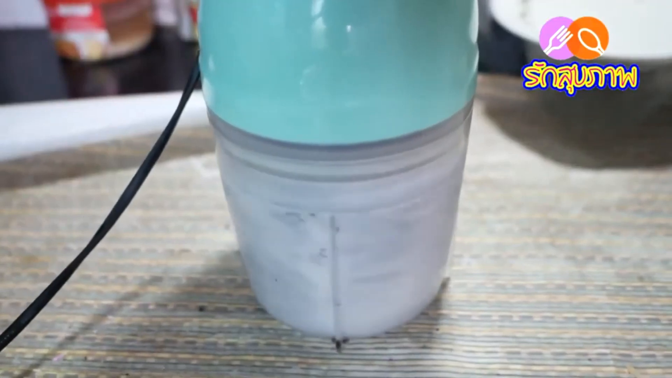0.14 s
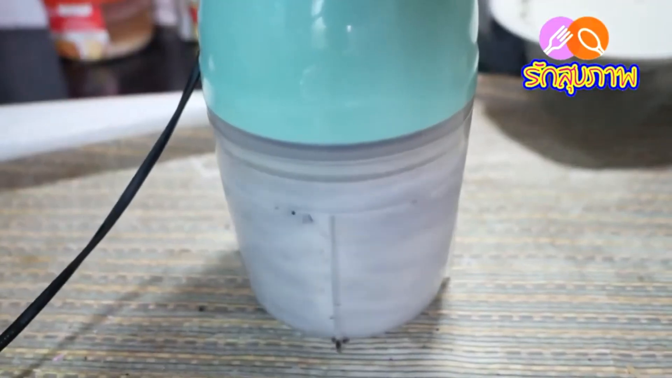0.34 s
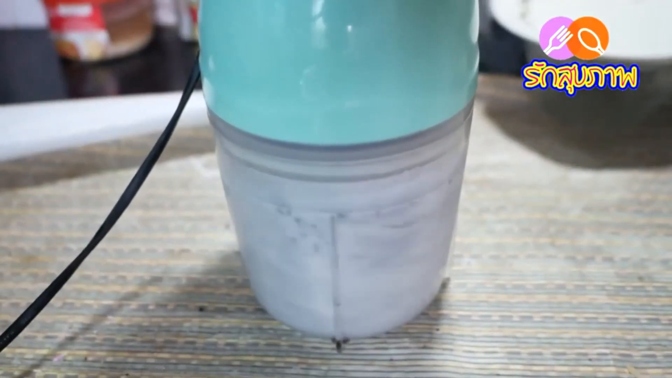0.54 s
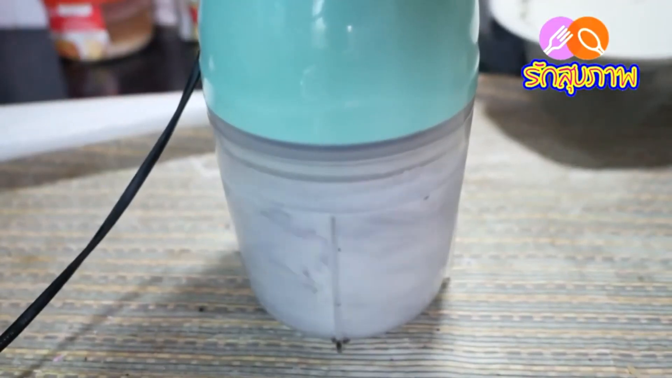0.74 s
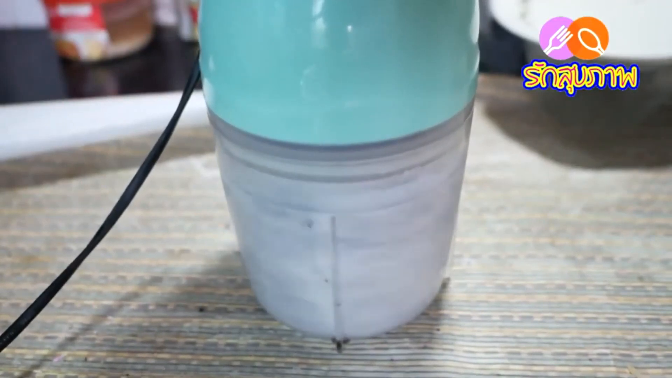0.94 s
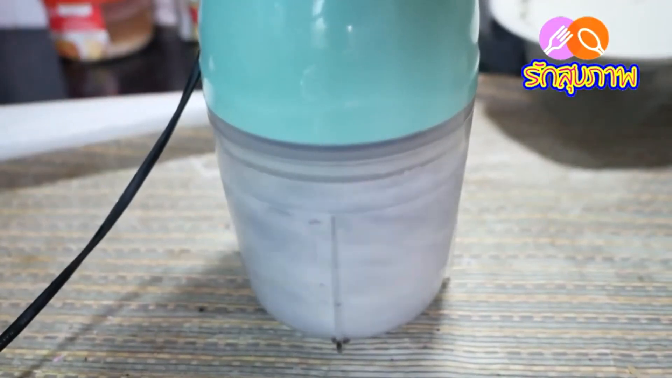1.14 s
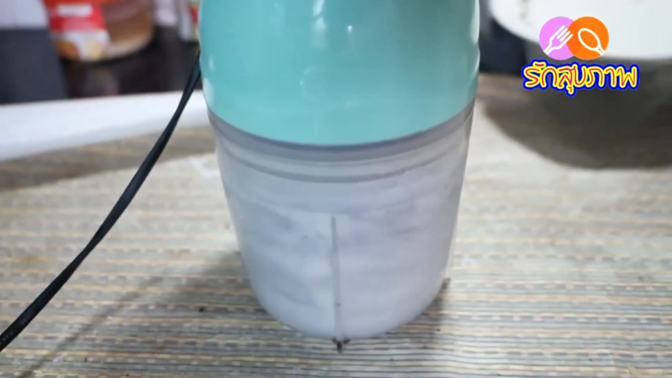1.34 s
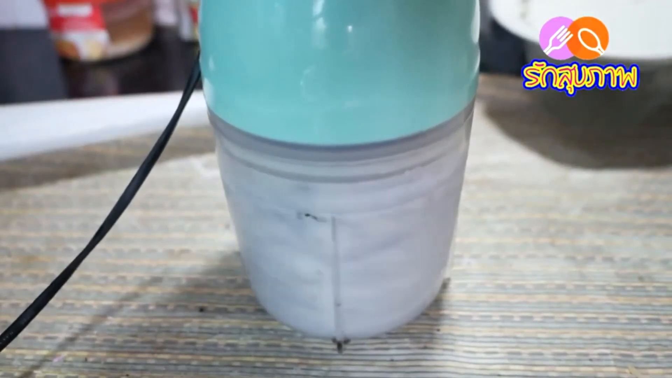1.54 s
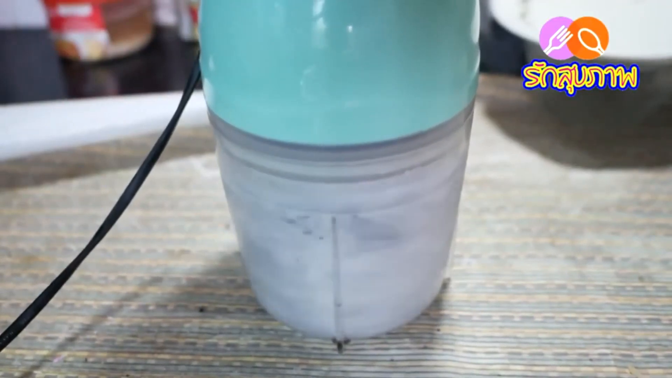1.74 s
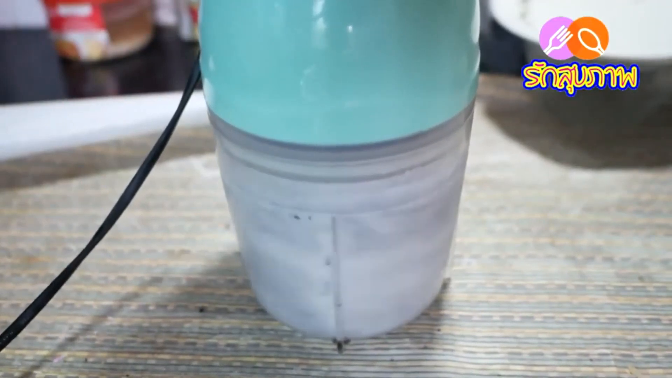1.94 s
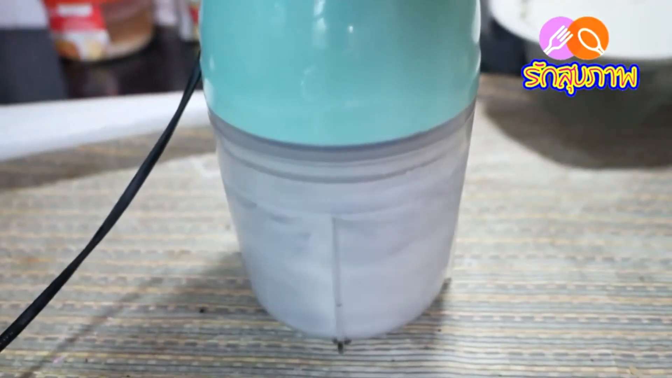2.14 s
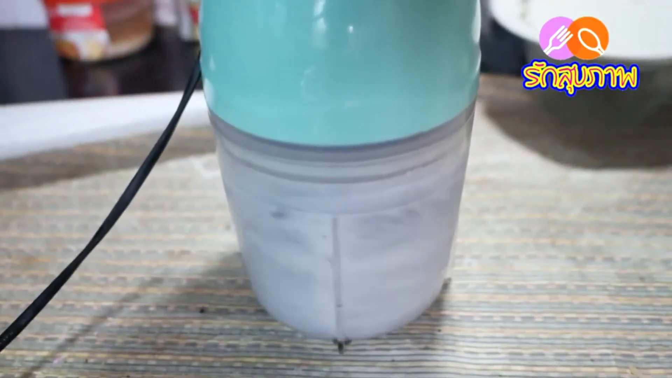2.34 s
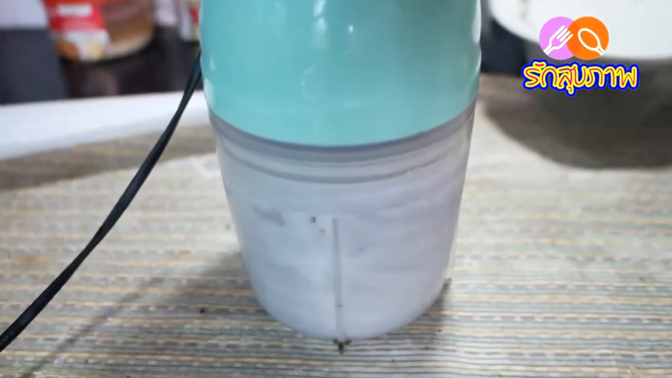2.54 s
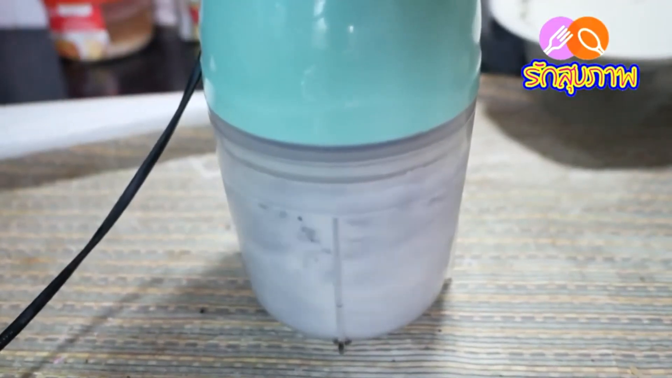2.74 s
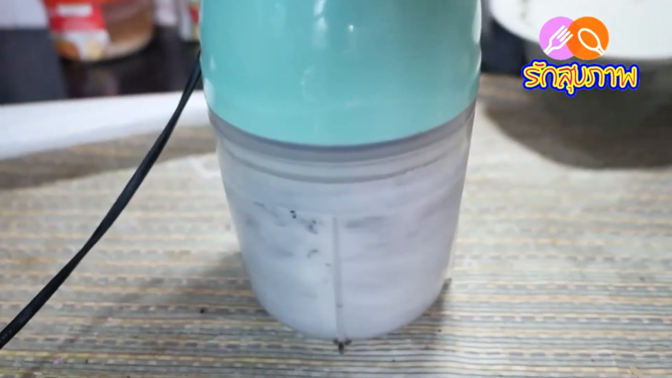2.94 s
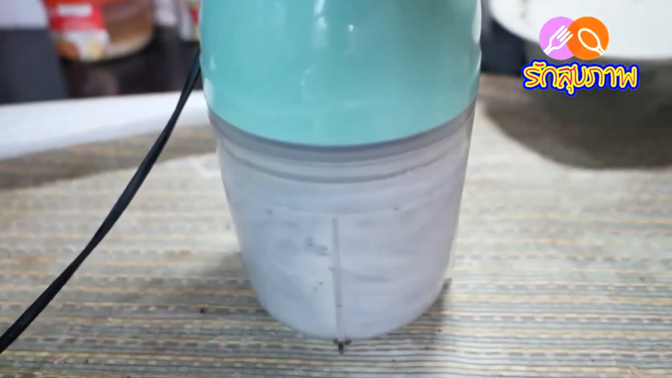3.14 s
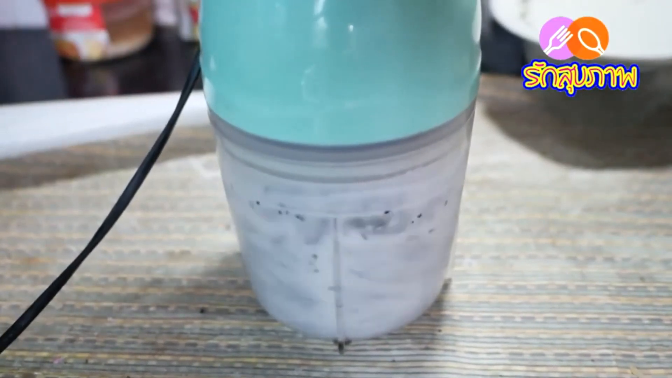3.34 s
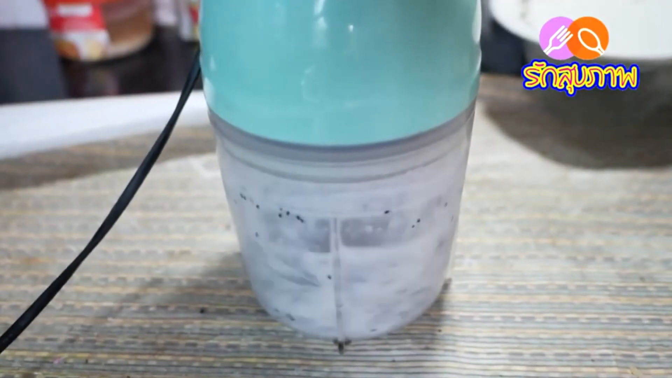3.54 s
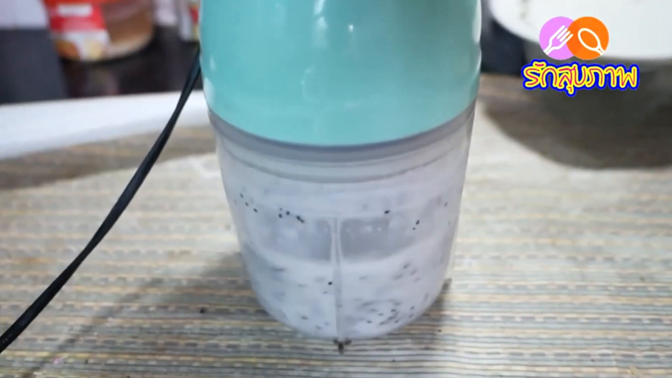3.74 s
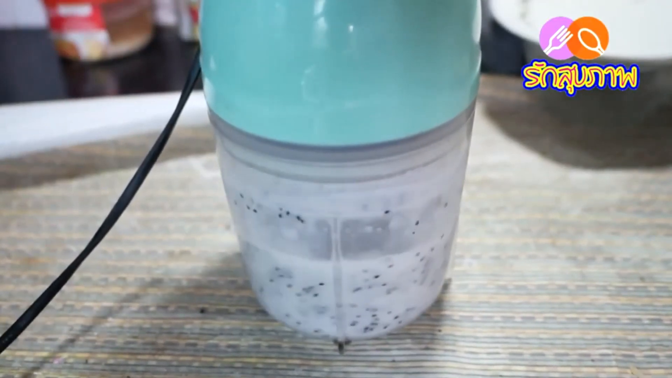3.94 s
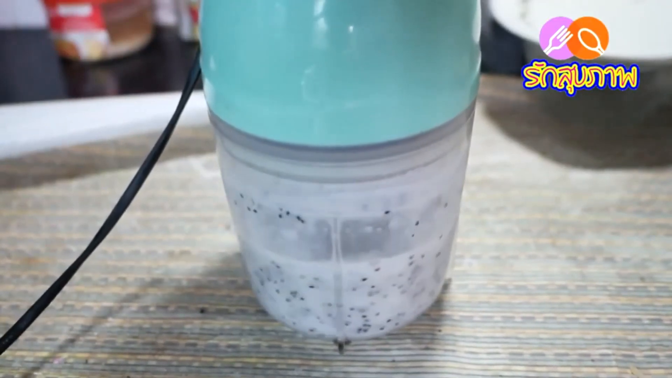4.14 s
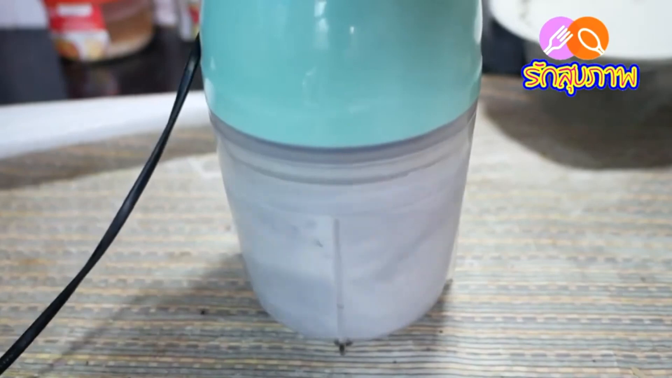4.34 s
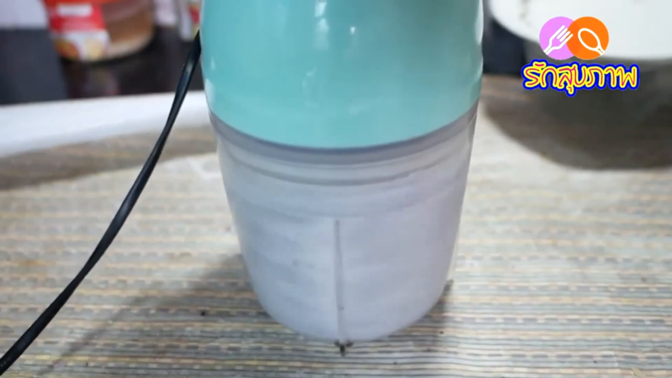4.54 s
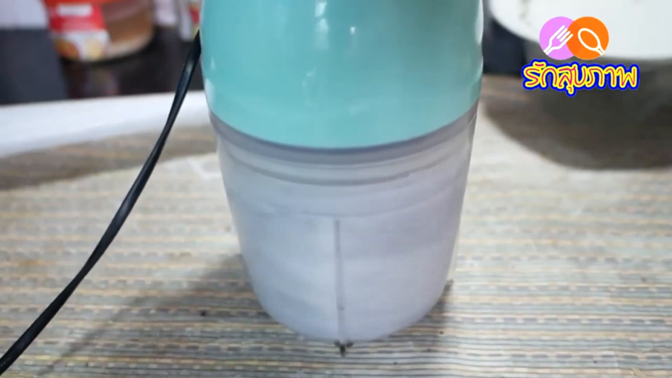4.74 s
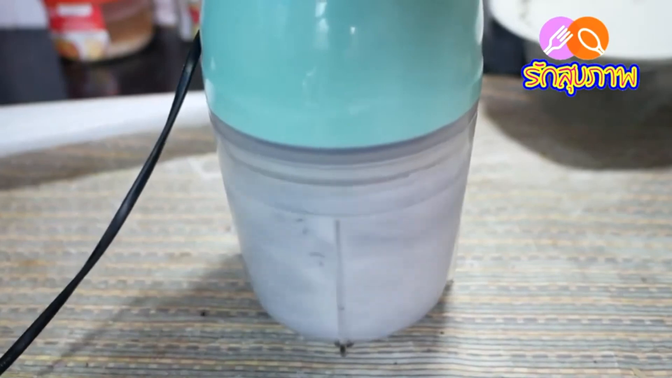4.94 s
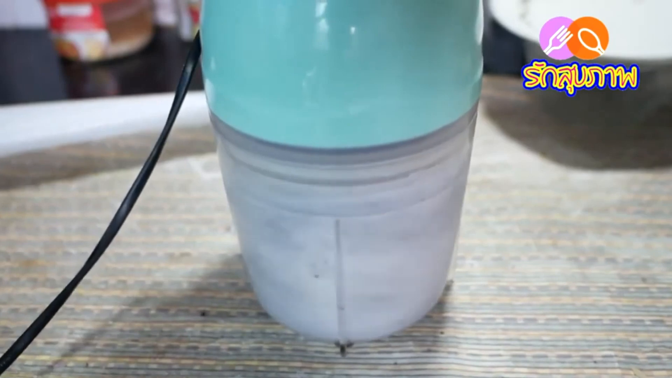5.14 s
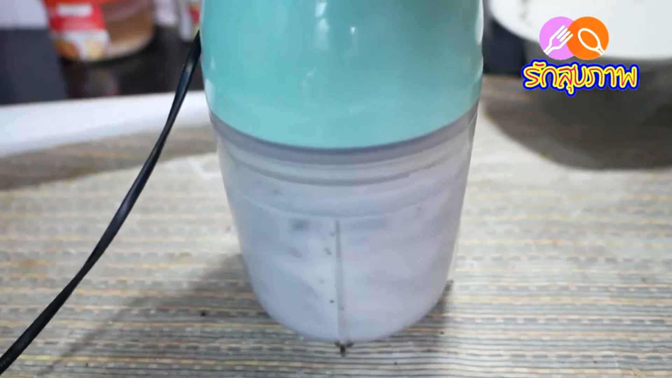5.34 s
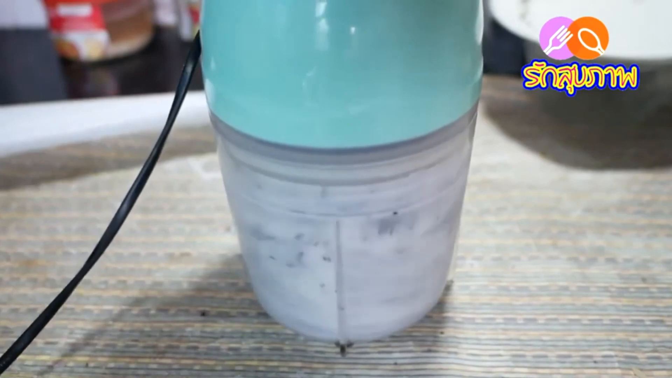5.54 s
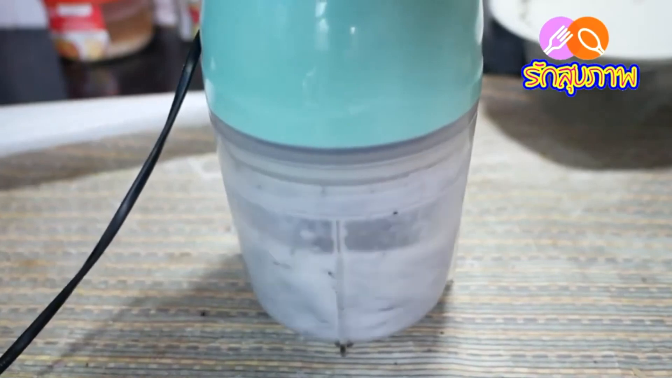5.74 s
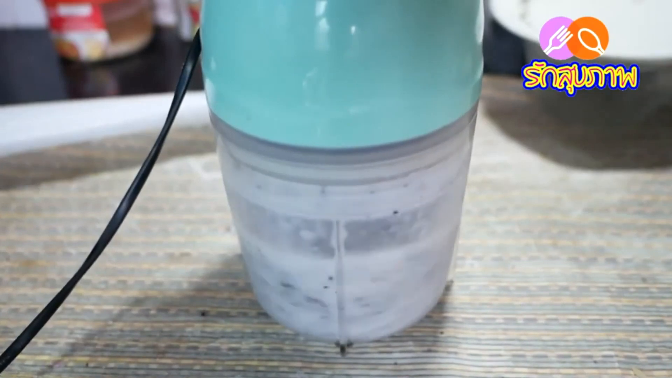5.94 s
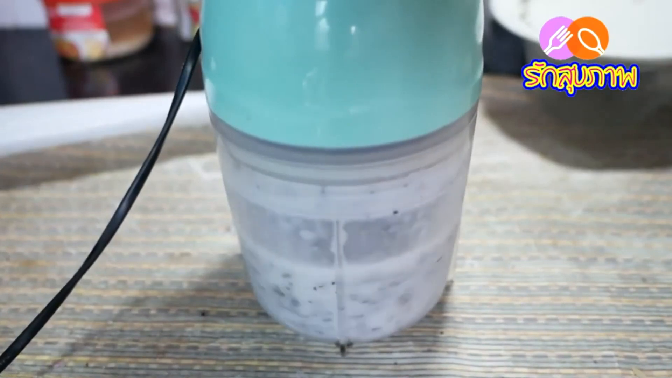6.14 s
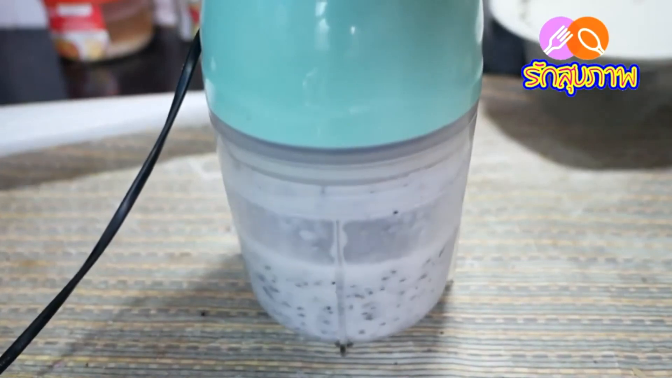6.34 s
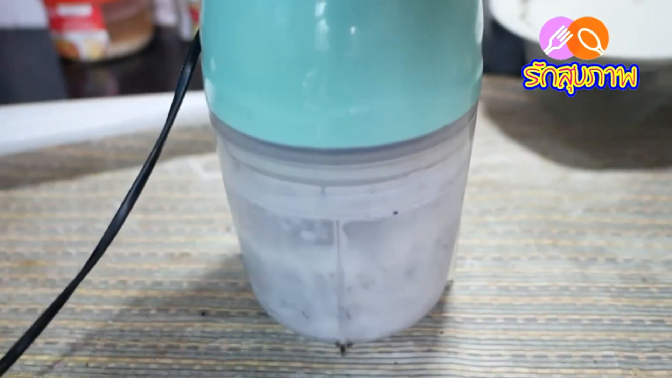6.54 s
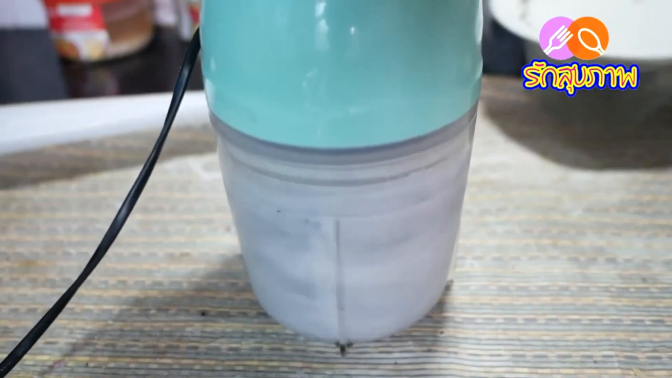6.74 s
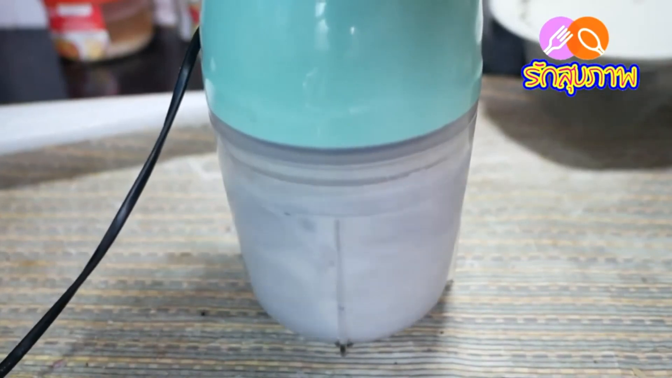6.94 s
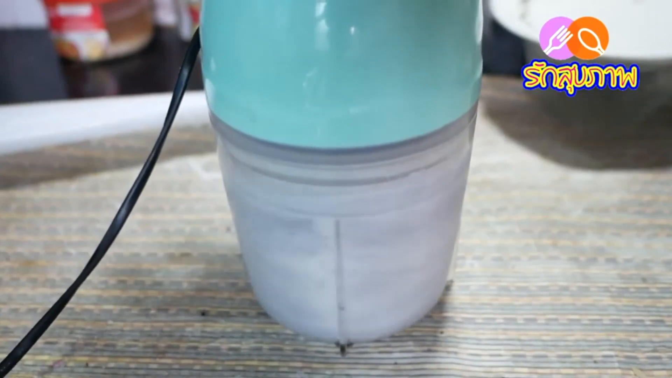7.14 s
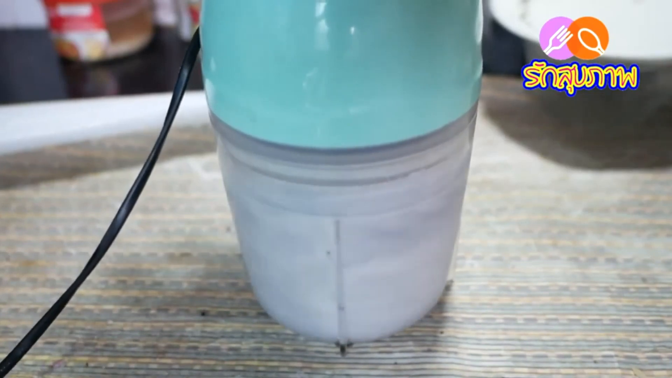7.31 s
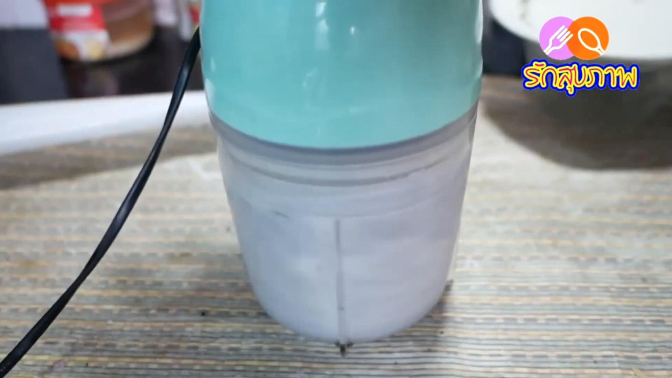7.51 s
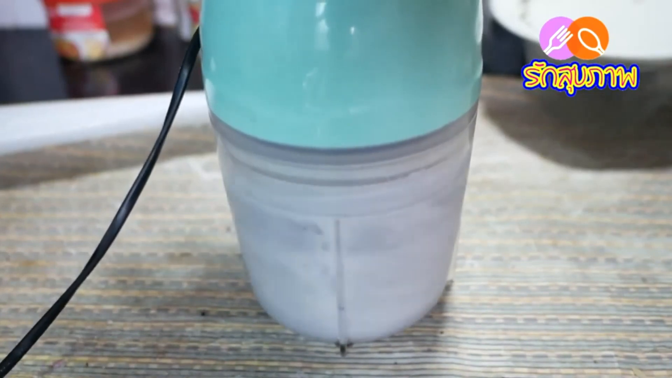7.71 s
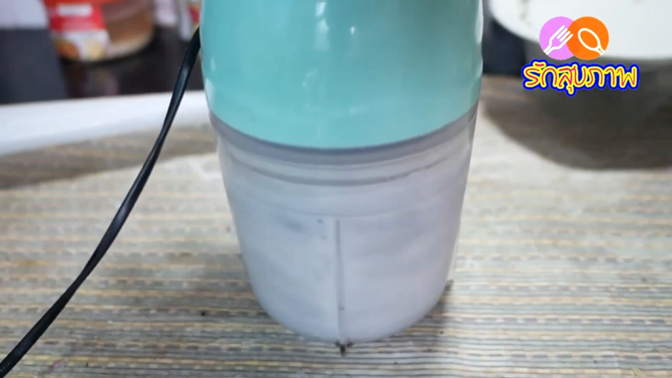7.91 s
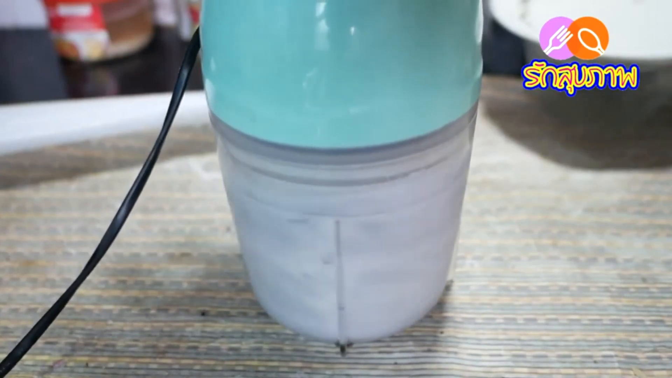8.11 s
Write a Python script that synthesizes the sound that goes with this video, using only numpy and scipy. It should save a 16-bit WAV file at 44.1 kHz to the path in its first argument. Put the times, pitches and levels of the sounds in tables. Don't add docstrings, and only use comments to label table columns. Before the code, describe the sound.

Hard ice lumps knock rapidly around a plastic blender cup over hissing slush; two coasting stops leave sparse clicks before the crunching roar restarts.

```python
import sys
import numpy as np
from scipy import signal
from scipy.fft import rfft, irfft, next_fast_len
from scipy.io import wavfile
from scipy.ndimage import uniform_filter1d

SR = 44100
rng = np.random.default_rng(int(sys.argv[2]) if len(sys.argv) > 2 else 0)


def unload_audio(sound):
    columns = np.transpose(np.atleast_2d(sound))
    steps = np.round(np.clip(columns, -1, 1) * 32767)
    wavfile.write(sys.argv[1], SR, steps.astype(np.int16))


def invert_db(level):
    return 10 ** (np.asarray(level, dtype=float) / 20)


N = 364866

# f/Hz, level/dB per Hz
KITCHEN = [(15, -40), (25, -10), (80, -9), (146, -11), (604, -13.5), (1500, -24.5), (5140, -28.5),
           (15000, -53)]
KITCHEN_DB = -63
HUM_HZ, HUM_DB = 50, -73
# f/Hz, T60/s
ROOM_T60 = [(200, 0.18), (1500, 0.097), (5000, 0.21), (14000, 0.015)]
# f/Hz, width/Hz, level/dB
TABLE_MODES = [(102, 22, -4), (192, 34, -1), (228, 30, -3), (125, 40, -2), (265, 50, -4)]
# t/s, level/dB
LURCHES = [
    (4.318, -25),
    (6.665, -22),
]

# on t/s, off t/s, blade stall t/s, lump heft level/dB, grit level/dB
BURSTS = [
    (-.06, 2.85, 3.32, -1.5, -1),
    (4.303, 5.13, 5.595, -6, -1.5),
    (6.654, 9, 9.5, -6.5, 0),
]
RATTLE, CRACKLE, THUD, SHAKE = range(4)
RUN_DB = [-21, -29.5, -22, -41]
BITE_DB = [14, 9, -9, 8]
BITE_S = [0.019, 0.21, 0.18, 0.19]
WEAR_DB_PER_S = [-1.07, -2.1, -3.5, -0.38]
COAST_DB_PER_S = [-12, -8.5, -27.5, -15]
REST_DB = [-20.5, -28, -31, -17.5]
REST_S = [0.41, 0.055, 0.22, 0.18]
STIR_DB = [-12.5, -25, -22, -40]
STIR_S = 0.033
GRAB_S, GRAB_DB = 0.036, -29
STALL_DB, STALL_S = -7, 0.02

GROAN_DB, GROAN_HZ, GROAN_WIDTH_HZ = -39.5, 419, 120
GROAN_FALL_S, GROAN_FADE_S = 0.7, 0.082

# top speed f/Hz, starting lag f/Hz, time constant t/s
SPIN = [(219, 76, .9), (213, 110, .27), (213, 100, .26)]
JAM_AT_S, JAM_HZ, JAM_S = 2.27, 5.5, 0.25
# 14th order level/dB, 15th order level/dB
SING_DB = [(-31, -36), (-34, -35), (-31, -35)]
SING_FROM_S = [.55, 4.66, 7.07]
# f/Hz, level/dB
HOUSING = [(2715, -24), (2775, -1), (2900, 1), (2965, -6), (3010, -8), (3160, -11), (3300, -20)]

# f/Hz, level/dB per Hz
CHIPS = [(1180, -65), (2000, -8), (2890, -11), (3150, -15.5), (3880, -8.5), (8260, -15), (14700, -31),
         (15600, -40.5)]
# f/Hz, width/Hz, level/dB
BLADE = [(3370, 90, -8), (3920, 80, -8), (4980, 60, -14), (6430, 120, -18.5)]
# f/Hz, level/dB per Hz
SLUSH = [(180, -24.5), (429, -6.5), (988, -9.5), (1410, -7.5), (1760, -18), (4000, -18), (5200, -12.5),
         (8800, -120)]
# f/Hz, width/Hz, level/dB
CUP = [(1500, 230, -6.5), (1294, 60, 1.5), (1539, 89, -2), (1765, 62, 1), (1984, 26, -7.5),
       (2342, 350, 2.5), (2500, 160, -15), (2650, 200, -6), (3514, 22, -12.5), (5180, 210, -13)]
# f/Hz, width/Hz, level/dB
FOOT = [(395, 29, 0.5), (448.4, 46, 9.5), (550, 53, 3.5), (729, 75, -0.5)]

# t/s, peak level/dB, ring f/Hz
SETTLING_TICKS = [(3.29, -18, 1260), (3.332, -24.5, 942), (3.375, -22, 905), (3.394, -23, 1300), (3.428, -31, 900),
                  (3.49, -37, 851), (3.506, -30, 937), (3.546, -26.5, 940), (3.623, -25, 905), (3.704, -33, 961),
                  (3.743, -32.5, 1500), (3.78, -31, 1830), (3.82, -38.5, 1900), (3.878, -43, 1900),
                  (3.941, -36.5, 2710), (3.972, -46, 2600), (3.988, -38, 960), (4.093, -36, 990),
                  (5.59, -15.5, 1110), (5.633, -42.5, 950), (5.654, -24.5, 1080), (5.678, -47, 1110),
           (5.709, -33, 2280), (5.739, -28, 1210), (5.793, -24, 1040), (5.827, -39.5, 1300),
           (5.86, -26, 1300), (5.888, -30.5, 1920), (5.922, -36, 1130), (5.962, -29.5, 1910),
           (6.038, -35, 1830), (6.091, -34, 1140), (6.194, -27.5, 1040), (6.25, -39.5, 1210),
           (6.379, -35.5, 1810), (6.432, -41.5, 1900), (6.548, -43, 960), (6.565, -41, 1810)]
TICKS = SETTLING_TICKS
# t/s, peak level/dB, pitch f/Hz
LONE_SNAPS = [(0.0205, -15.5, 3670), (0.0503, -4.5, 3870), (0.1386, -10, 5480), (0.329, -15.5, 3730),
              (0.5152, -19, 3080), (0.5376, -12, 4950), (0.7143, -17, 3750), (0.8376, -18.5, 4860),
              (0.8598, -22.5, 4800), (0.914, -14.5, 3630), (0.99, -16, 3920), (3.0346, -18, 4670),
              (3.0939, -17.5, 3900), (3.1446, -12.5, 3930), (3.2162, -21.5, 3880), (3.234, -11.5, 3970),
              (3.277, -18, 5020), (3.2894, -15, 6500), (3.3736, -16.5, 3850), (3.518, -31.5, 6000),
              (3.532, -32, 8000), (3.584, -28.5, 7900), (3.64, -38.5, 6000), (3.674, -49, 7000),
              (3.7392, -31.5, 3370), (3.762, -49, 8500),
              (4.33, -6.5, 3060), (4.3727, -14, 3620), (4.4232, -10, 3880), (4.546, -14, 3510),
           (4.836, -12, 3130), (5.177, -9.5, 3650), (5.307, -4, 3160), (5.3059, -12.5, 5920),
           (5.3929, -16, 3660), (5.4368, -11, 3730), (5.503, -16.5, 4880), (5.531, -14, 3430),
           (5.6317, -26.5, 3940), (5.68, -24.5, 3460), (5.71, -30.5, 4000), (5.84, -42.5, 5330),
           (5.902, -41.5, 5280), (5.9644, -36, 2940), (6.078, -41.5, 4470), (6.15, -45.5, 7500),
           (6.193, -30.5, 5100), (6.336, -53, 5000),
              (6.692, -16.5, 3000), (6.6907, -10, 2940), (6.734, -11, 5180), (6.855, -30.5, 5000),
           (7.0, -12.5, 5100), (7.02, -13.5, 5040), (7.769, -12, 6130), (7.8392, -10.5, 7700),
           (8.016, -13.5, 8340), (8.238, -21, 7630)]
SNAPS = LONE_SNAPS
# t/s, force level/dB, foot thud level/dB
CUP_KNOCKS = [(0.0208, -16, -25), (0.0562, -16, -23), (0.0802, -14, -22), (0.095, -16, -27),
              (0.1468, -13, -18), (0.1696, -16, -26), (0.2188, -15, -20), (0.2353, -17, -14),
              (0.25, -13, -20), (0.2582, -11, -20), (0.2715, -10, -19), (0.2802, -7, -19), (0.2863, -14, -19),
              (0.2932, -15, -23), (0.318, -16, -18), (0.3319, -16, -26), (0.3659, -15, -20),
              (0.3834, -16, -22), (0.4053, -13, -14), (0.4158, -13, -29), (0.4395, -13, -20),
              (0.4451, -11, -20), (0.4561, -14, -17), (0.5002, -12, -14), (0.5192, -8, -16),
              (0.5548, -12, -22), (0.5836, -15, -20), (0.6004, -8, -20), (0.6177, -13, -15),
              (0.6398, -11, -17), (0.6561, -12, -23), (0.6828, -13, -20), (0.6972, -15, -20),
              (0.7148, -16, -22), (0.7417, -14, -16), (0.7485, -11, -21), (0.7766, -15, -16),
              (0.7844, -11, -22), (0.7918, -12, -22), (0.8016, -14, -21), (0.826, -11, -21),
              (0.8626, -16, -25), (0.8747, -9, -17), (0.8811, -15, -18), (0.8899, -15, -21),
              (0.9139, -14, -17), (0.921, -10, -18), (0.9324, -13, -21), (0.9692, -14, -30),
              (1.0043, -12, -22), (1.0106, -14, -22), (1.0514, -16, -25), (1.0745, -16, -19),
              (1.0826, -14, -19),
              (1.1068, -15, -21), (1.1174, -16, -21), (1.128, -17, -30), (1.153, -13, -21),
                (1.1605, -13, -22), (1.1842, -9, -19), (1.1949, -13, -25), (1.2428, -17, -22),
                (1.2669, -11, -20), (1.2901, -15, -29), (1.3149, -13, -15), (1.3328, -13, -20),
                (1.3493, -12, -24), (1.3625, -16, -29), (1.3824, -10, -21), (1.398, -16, -16),
                (1.4372, -14, -21), (1.4448, -15, -25), (1.4677, -12, -22), (1.4991, -16, -22),
                (1.5352, -14, -17), (1.5431, -10, -15), (1.5716, -14, -22), (1.6226, -16, -25),
                (1.6734, -13, -16), (1.6793, -15, -15), (1.7062, -11, -18), (1.7272, -18, -18),
                (1.7341, -14, -17), (1.7532, -12, -22), (1.7609, -12, -22), (1.7699, -17, -21),
                (1.798, -17, -31), (1.8267, -18, -26), (1.845, -19, -20), (1.8544, -10, -14),
                (1.8684, -13, -22), (1.898, -16, -20), (1.9114, -19, -23), (1.9234, -17, -29),
                (1.9346, -20, -25), (1.9483, -17, -15), (1.963, -15, -26), (1.9811, -9, -15),
                (1.9998, -18, -25), (2.015, -12, -20), (2.0817, -14, -21), (2.0979, -16, -25),
                (2.1253, -12, -29), (2.1578, -13, -24),
              (2.2023, -11, -23), (2.2209, -10, -24), (2.2482, -16, -15), (2.26, -10, -18),
                 (2.277, -9, -19), (2.2967, -16, -35), (2.3105, -15, -20), (2.3583, -12, -24),
                 (2.4193, -9, -18), (2.45, -13, -15), (2.468, -12, -25), (2.5094, -18, -30),
                 (2.5185, -15, -23), (2.5325, -18, -32), (2.5485, -10, -19), (2.5594, -13, -19),
                 (2.5893, -18, -26), (2.5999, -18, -26), (2.6177, -18, -22), (2.6569, -13, -27),
                 (2.6904, -19, -24), (2.7147, -16, -28), (2.7416, -18, -25), (2.7682, -15, -20),
                 (2.7756, -15, -25), (2.8242, -14, -19), (2.8343, -12, -16), (2.8463, -11, -21),
                 (2.8609, -20, -24), (2.8663, -16, -24), (2.8788, -8, -14), (2.89, -14, -20),
                 (2.9373, -19, -21), (2.945, -17, -24), (2.9824, -15, -29), (2.9969, -20, -30),
                 (3.036, -20, -24), (3.0449, -14, -21), (3.0603, -21, -30), (3.089, -17, -23),
                 (3.1019, -10, -23), (3.1177, -20, -33), (3.1405, -15, -29), (3.1499, -19, -27),
                 (3.156, -17, -30), (3.2115, -18, -29), (3.2459, -21, -29), (3.2929, -22, -31),
                 (3.3004, -21, -35), (3.3151, -25, -45),
              (4.3304, -14, -25), (4.3377, -12, -22), (4.3504, -15, -23), (4.3709, -17, -25),
            (4.3999, -16, -32), (4.4512, -14, -29), (4.4626, -14, -26), (4.506, -10, -18),
            (4.5384, -16, -25), (4.5552, -11, -20), (4.5617, -13, -21), (4.6005, -15, -20),
            (4.6235, -18, -24), (4.6474, -14, -23), (4.6836, -14, -23), (4.6916, -16, -29),
            (4.7072, -18, -27), (4.7601, -18, -29), (4.8004, -16, -23), (4.807, -14, -25),
            (4.8124, -15, -25), (4.8194, -13, -26), (4.8376, -17, -29), (4.8981, -16, -15),
            (4.9045, -8, -19), (4.9189, -16, -28), (4.9901, -12, -16), (5.0258, -14, -20),
            (5.032, -10, -20), (5.0448, -15, -26), (5.0826, -12, -23), (5.0926, -16, -16),
            (5.1169, -16, -27), (5.1274, -15, -25), (5.1366, -10, -19), (5.1473, -18, -26),
            (5.1756, -11, -17), (5.2601, -19, -21), (5.269, -14, -18), (5.2859, -17, -28),
            (5.3304, -18, -22), (5.3428, -9, -20), (5.3654, -18, -28), (5.3936, -19, -26),
            (5.4063, -16, -23), (5.4228, -20, -24), (5.4644, -16, -28), (5.4704, -18, -29),
            (5.5282, -19, -29), (5.5376, -22, -39), (5.5553, -22, -39), (5.5645, -21, -35),
              (6.6836, -13, -24), (6.7001, -16, -25), (6.7077, -13, -32), (6.7275, -14, -28),
            (6.7359, -15, -26), (6.7449, -16, -32), (6.7698, -15, -30), (6.8803, -11, -26),
            (6.9262, -13, -22), (6.9385, -16, -28), (6.9582, -12, -29), (6.9775, -16, -30),
            (7.0029, -9, -18), (7.0249, -17, -18), (7.0396, -13, -25), (7.073, -16, -19),
            (7.1173, -18, -28), (7.135, -14, -21), (7.1425, -16, -23), (7.1574, -15, -27),
            (7.1892, -10, -16), (7.2031, -14, -23), (7.2796, -7, -19), (7.2999, -13, -21),
            (7.3314, -15, -26), (7.3399, -16, -28), (7.4397, -14, -24), (7.4618, -13, -20),
            (7.4814, -12, -24), (7.5036, -16, -31), (7.5435, -16, -26), (7.6233, -16, -31),
            (7.6659, -16, -22), (7.6906, -18, -30), (7.6978, -16, -25), (7.7144, -16, -23),
            (7.722, -9, -20), (7.7363, -10, -21), (7.7633, -18, -30), (7.8195, -14, -21), (7.874, -15, -24),
            (7.8858, -12, -22), (7.8966, -14, -20), (7.9071, -13, -19), (7.914, -13, -18),
            (7.9264, -15, -27), (7.9461, -15, -29), (7.9548, -17, -25), (7.9665, -12, -23),
            (7.98, -10, -23), (8.0761, -12, -32), (8.0897, -15, -24), (8.1383, -17, -28),
            (8.1445, -13, -28), (8.1497, -13, -29), (8.164, -17, -31), (8.1893, -15, -24),
            (8.2094, -8, -19), (8.2214, -14, -31), (8.2298, -14, -30)]
KNOCKS = CUP_KNOCKS
RING_S, CRUNCH_S, CRUNCH = 0.011, 0.003, 0.15
DETUNE, LEAN = 0.026, 0.32

# t/s, length t/s
APART = [(0.104, 0.046), (0.244, 0.035), (0.464, 0.035), (0.894, 0.058), (1.3, 0.046), (1.73, 0.058),
         (1.834, 0.058), (2.276, 0.035), (2.485, 0.046), (2.67, 0.081), (2.763, 0.058), (2.868, 0.07),
         (3.204, 0.035), (3.68, 0.058), (3.855, 0.081), (4.017, 0.07), (4.11, 0.163), (4.725, 0.046),
         (5.166, 0.093), (5.735, 0.058), (5.817, 0.035), (6.235, 0.139), (6.502, 0.046), (7.303, 0.046),
         (7.616, 0.081)]


def evened(x):
    return x / np.sqrt(np.mean(x ** 2) + 1e-20)


def top(x):
    return x / abs(x).max()


def read(points, hz):
    f, value = np.transpose(points)
    return np.interp(np.log(hz + 1), np.log(f + 1), value)


def coloured(x, points):
    size = next_fast_len(len(x))
    gain = invert_db(read(points, np.fft.rfftfreq(size, 1 / SR)))
    return irfft(rfft(x, size) * gain, size)[:len(x)]


def ring(x, hz, width):
    r = np.exp(-np.pi * abs(width) / SR)
    w = 2 * np.pi * hz / SR
    return signal.lfilter([0, r * np.sin(w)], [1, -2 * r * np.cos(w), r * r], x)


def sines(modes, share, t):
    return sum(a * invert_db(db) * np.exp(-np.pi * width * t) * np.sin(2 * np.pi * hz * t)
               for (hz, width, db), a in zip(modes, share))


def blunt(x):
    return np.convolve(x, np.hanning(9)[1:-1] / 4)[:len(x)]


def blows(per_s, spread_db, clump_db, clump_s):
    clumps = evened(uniform_filter1d(rng.standard_normal(N), max(int(clump_s * SR), 2)))
    size = invert_db(spread_db * np.minimum(rng.exponential(1, N), 4) + clump_db * clumps)
    return size * (rng.random(N) < per_s / SR)


def struck(train, modes):
    rung = sum(invert_db(db) * ring(train * rng.normal(1, 1.0, N), hz, width) for hz, width, db in modes)
    return evened(blunt(rung))


def churn(layer):
    t = np.arange(0, N / SR + 0.002, 0.001)
    gain = sum(invert_db(db + STIR_DB[layer]) * (t > s) * np.exp(-np.maximum(t - s, 0) / STIR_S)
               for s, db, _ in TICKS)
    for on, off, stall, heft_db, grit_db in BURSTS:
        age = np.maximum(t - on, 0)
        stopped = np.maximum(t - stall, 0)
        db = RUN_DB[layer] + [0, grit_db, heft_db, 0][layer]
        db = db + GRAB_DB * np.maximum(1 - age / GRAB_S, 0)
        db = db + BITE_DB[layer] * np.exp(-age / BITE_S[layer])
        db = db + WEAR_DB_PER_S[layer] * age
        db = db + COAST_DB_PER_S[layer] * np.clip(t - off, 0, stall - off)
        db = db + STALL_DB * np.clip((t - stall) / STALL_S, 0, 1)
        db = db + REST_DB[layer] * (1 - np.exp(-stopped / REST_S[layer]))
        gain = gain + invert_db(db) * (t > on)
    return np.interp(np.arange(N) / SR, t, gain)


def flow():
    return np.clip((20 * np.log10(churn(RATTLE)) + 46) / 14, 0.12, 1)


def kitchen():
    hum = np.sqrt(2) * invert_db(HUM_DB) * np.sin(2 * np.pi * HUM_HZ * np.arange(N) / SR)
    return invert_db(KITCHEN_DB) * evened(coloured(rng.standard_normal(N), KITCHEN)) + hum


def room(x):
    taps = np.zeros(SR // 2)
    at = np.arange(100, SR // 2 - 20, 20)
    taps[at + rng.integers(0, 20, len(at))] = rng.choice([-1., 1.], len(at))
    hz, t, z = signal.stft(taps, SR, nperseg=256)
    decay = invert_db(-60 * t / read(ROOM_T60, hz)[:, None])
    tail = signal.istft(z * decay, SR, nperseg=256)[1]
    return signal.oaconvolve(x, tail / np.linalg.norm(tail))[:N]


def table():
    shake = rng.standard_normal(N)
    modes = sum(invert_db(db) * evened(ring(ring(shake, hz, width), hz, 3 * width))
                for hz, width, db in TABLE_MODES)
    stiff = signal.butter(8, 98, "high", fs=SR, output="sos")
    hum = evened(signal.sosfilt(stiff, modes)) + invert_db(-21) * evened(ring(shake, 62, 25))
    return invert_db(2.5) * churn(SHAKE) * hum


def lurch():
    t = np.arange(N) / SR
    swell = sum(invert_db(db) * (t > s) * np.exp(-np.maximum(t - s, 0) / 0.093) for s, db in LURCHES)
    return uniform_filter1d(swell, 400) * evened(ring(rng.standard_normal(N), 880, 230))


def groan():
    t, out = np.arange(N) / SR, 0
    lumpy = blows(per_s=400, spread_db=1, clump_db=2, clump_s=0.03) * np.exp(2j * np.pi * rng.random(N))
    r = np.exp(-np.pi * GROAN_WIDTH_HZ / SR)
    slow = signal.lfilter([1], [1, -2 * r, r * r], lumpy)
    for on, off, stall, *_ in BURSTS:
        hz = GROAN_HZ * np.exp(-np.clip(t - off, 0, 1) / GROAN_FALL_S)
        rise = np.clip((t - off) / (stall - off), 0, 1)
        fade = np.exp(-np.maximum(t - stall, 0) / GROAN_FADE_S)
        out = out + rise * fade * np.exp(2j * np.pi * np.cumsum(hz) / SR)
    return invert_db(GROAN_DB) * (out * slow).real / np.std(slow.real)


def motor():
    t = np.arange(N) / SR
    power = np.array([(t > on) & (t < off) for on, off, *_ in BURSTS])
    shaft_hz = 0
    for powered, (on, *_), (top_hz, lag_hz, ease_s) in zip(power, BURSTS, SPIN):
        shaft_hz = shaft_hz + powered * (top_hz - lag_hz * np.exp(-np.maximum(t - on, 0) / ease_s))
    jam = JAM_HZ * (t > JAM_AT_S) * np.exp(-abs(t - JAM_AT_S) / JAM_S)
    shaft_hz = shaft_hz - uniform_filter1d(jam, 4000)
    shaft_hz = shaft_hz * (1 + 0.0024 * evened(uniform_filter1d(rng.standard_normal(N), 1500)))
    flutter_db = 3.2 * evened(uniform_filter1d(rng.standard_normal(N), 400))
    turns = np.cumsum(shaft_hz) / SR
    singing = power & (t > np.c_[SING_FROM_S])
    gains = uniform_filter1d(invert_db(np.transpose(SING_DB)) @ singing, 2000)
    whine = 0
    for order, gain in zip((14, 15), gains):
        passed = invert_db(read(HOUSING, abs(order * shaft_hz)) + flutter_db)
        whine = whine + gain * passed * np.sin(2 * np.pi * order * turns)
    return np.sqrt(2) * whine


def crackle():
    t = np.arange(300) / SR
    splits = blows(per_s=230, spread_db=3.8, clump_db=3.5, clump_s=0.011)
    puffs = signal.oaconvolve(splits, np.exp(-t / 0.0013))[:N]
    share = flow()
    spray = (evened(puffs) * np.sqrt(share) + 2.0 * share) * rng.standard_normal(N)
    blade = sum(invert_db(db) * evened(ring(spray, hz, width)) for hz, width, db in BLADE)
    chips = invert_db(1.0) * churn(CRACKLE) * evened(coloured(spray, CHIPS))
    return chips + invert_db(-13.5) * churn(RATTLE) * share * blade


def aftermath():
    s, force_db = np.transpose(KNOCKS)[:2]
    hits = np.bincount((s * SR).astype(int), invert_db(force_db), N)
    return 0.38 + 2.2 * signal.lfilter([1], [1, -np.exp(-1 / (0.001 * SR))], hits)


def rattle():
    train = blows(per_s=350, spread_db=1.2, clump_db=1.8, clump_s=0.015) * aftermath()
    wash = evened(coloured(rng.standard_normal(N), SLUSH))
    share = flow()
    damped = struck(train + rng.random(N), [(900, 100, -12), (1900, 270, -6)])
    walls = invert_db(-5.5) * (share * struck(train, CUP) + (1 - share) * np.sqrt(share) * damped)
    slush = invert_db(-8.5) * share * wash * evened(uniform_filter1d(train, size=1300))
    return churn(RATTLE) * (walls + slush) + invert_db(-6.5) * churn(THUD) * struck(train, FOOT)


def bounced(sound, luck):
    lag = int(SR * (0.003 + 0.003 * abs(luck[0])))
    return sound + 0.3 * np.tanh(luck[1] + 0.7) * np.r_[np.zeros(lag), sound[:-lag]]


def tick(peak_db, hz, luck, t):
    modes = [(hz, 110, 13)] + CUP
    walls = blunt(sines(modes, np.r_[1, 0.5 + 0.4 * luck[:20]], t)) * np.exp(-t / 0.008)
    scrape = blunt(coloured(luck * np.exp(-t / 0.0066), CHIPS))
    return invert_db(peak_db + 0.5) * bounced(top(walls) + invert_db(-11.0) * top(scrape), luck[30:])


def snap(peak_db, hz, luck, t):
    puff = luck * np.exp(-t / 0.0028)
    return invert_db(peak_db + 1.5) * top(top(coloured(puff, CHIPS)) + 0.9 * top(ring(puff, hz, 1800)))


def knock(force_db, thud_db, luck, t):
    lean = (np.transpose(CUP)[0] / 1600) ** (LEAN * luck[44])
    walls = sines(CUP, lean * (0.8 + 0.2 * luck[:len(CUP)]), t * (1 + DETUNE * luck[45]))
    crumbs = CRUNCH * luck * (abs(luck) > 2) * np.exp(-t / CRUNCH_S)
    walls = np.convolve(walls, np.r_[1, crumbs[1:300]])[:len(t)]
    walls = walls * np.exp(-(t / RING_S) ** 2)
    walls = signal.sosfilt(signal.butter(5, 3000, fs=SR, output="sos"), walls)
    thud = sines(FOOT, 0.95 + 0.3 * luck[20:], t * (1 + DETUNE * luck[46]))
    thud = thud * (1 - np.exp(-t / 0.0065)) * np.exp(-t / 0.0073)
    loudest = np.sqrt(uniform_filter1d(walls ** 2, 130).max())
    return -invert_db(force_db - 0.5) * walls / loudest - invert_db(thud_db + 0.5) * top(thud)


def lumps():
    out, t = np.zeros(N + 2000), np.arange(2000) / SR
    fade = np.sqrt(abs(1 - t / t[-1])) * np.minimum(t / 0.0002, 1)
    for rows, source in [(TICKS, tick), (SNAPS, snap), (KNOCKS, knock)]:
        for (s, *row), luck in zip(rows, rng.standard_normal((len(rows), len(t)))):
            out[round(s * SR):][:len(t)] += source(*row, luck, t) * fade
    return out[:N]


def scene():
    impacts = lumps()
    blender = rattle() + crackle() + motor() + lurch() + impacts + invert_db(-11) * room(impacts)
    small = signal.butter(4, 335, "high", fs=SR, output="sos")
    mix = signal.sosfilt(small, blender) + table() + groan() + kitchen()
    return np.array([mix, mix])


def band_limit(x):
    return signal.sosfilt(signal.butter(12, 15760, fs=SR, output="sos"), x)


def record(dry):
    soft, t = 1.4 * np.tanh(dry / 1.4), np.arange(N) / SR
    gate = sum((t > s) & (t < s + length) for s, length in APART)
    grain = evened(uniform_filter1d(rng.standard_normal(N), 40))
    differ = invert_db(-21) * gate * soft[0] * grain
    differ = differ - uniform_filter1d(differ, 600)
    return band_limit(soft + np.array([differ, -differ]))


dry = scene()
out = record(dry)
unload_audio(out)
```